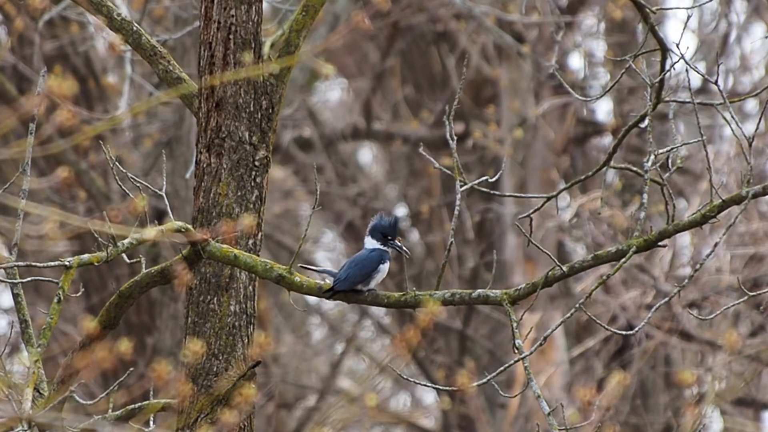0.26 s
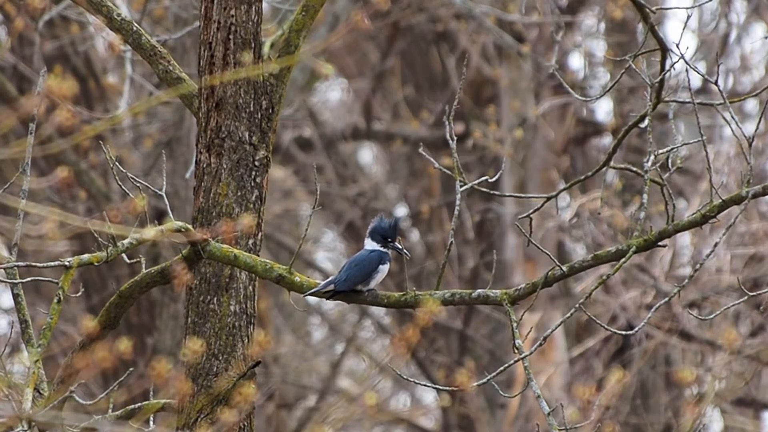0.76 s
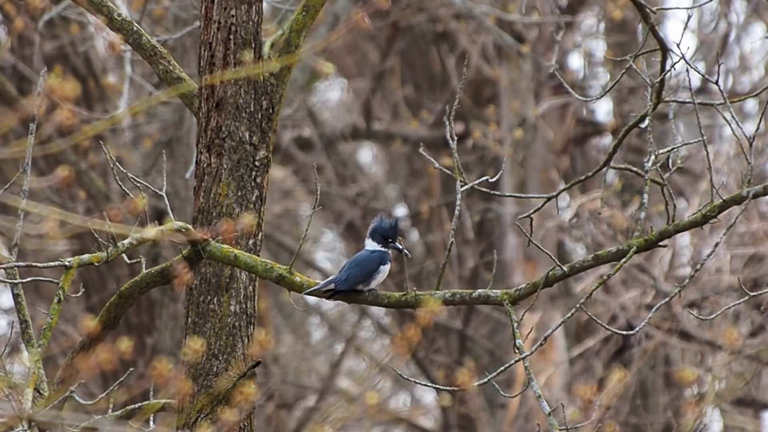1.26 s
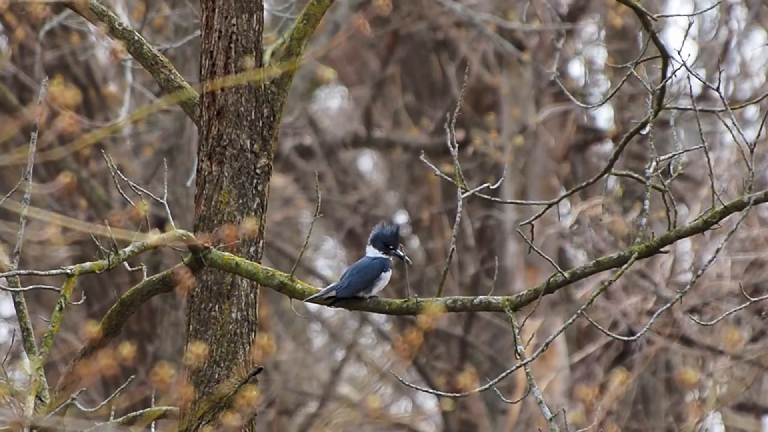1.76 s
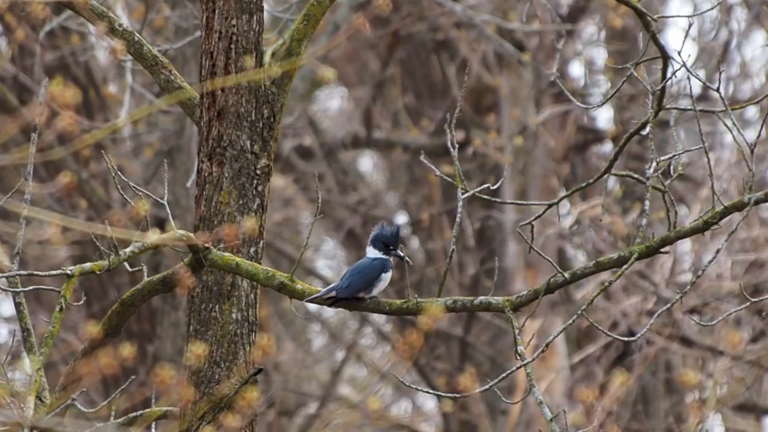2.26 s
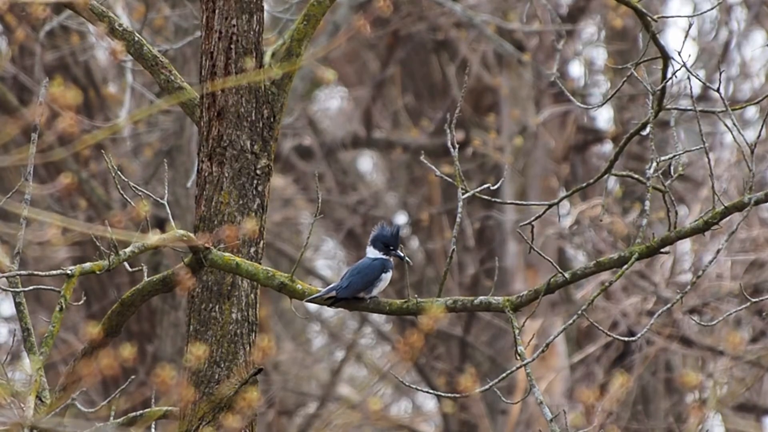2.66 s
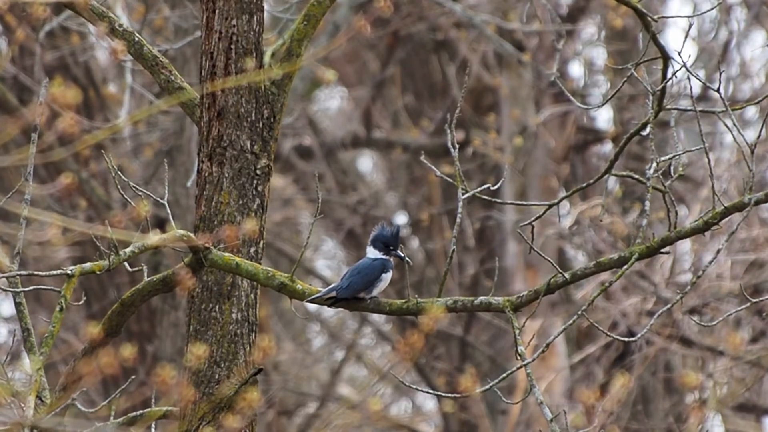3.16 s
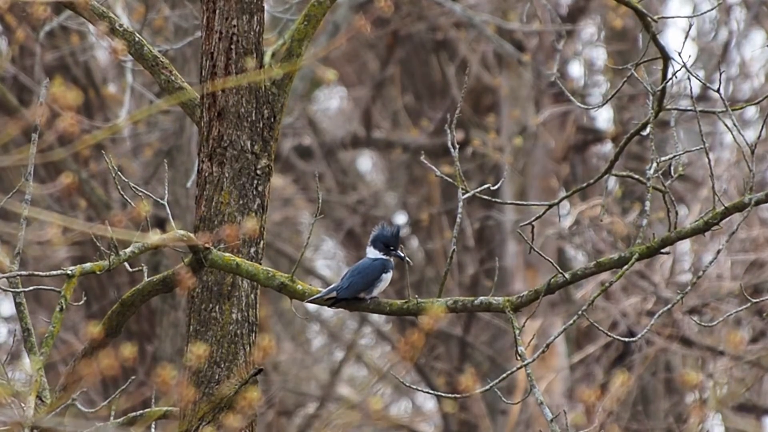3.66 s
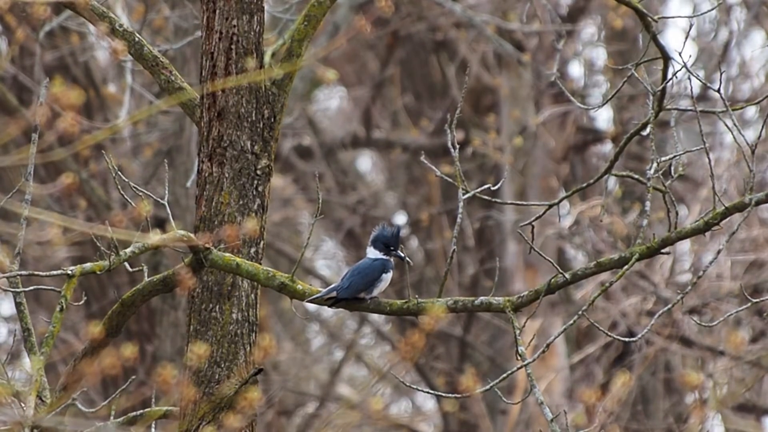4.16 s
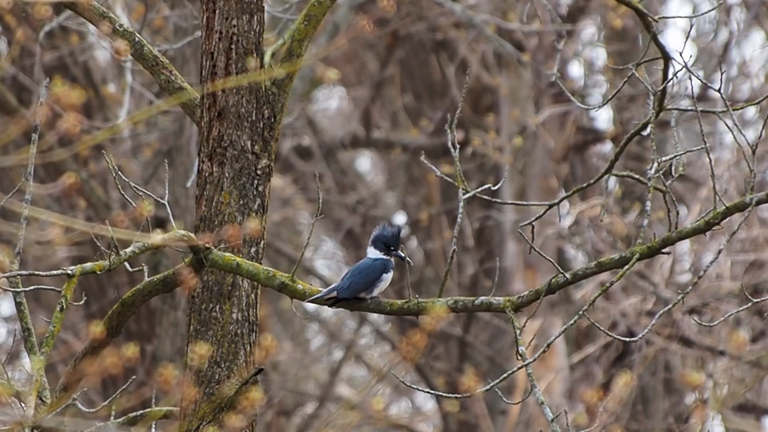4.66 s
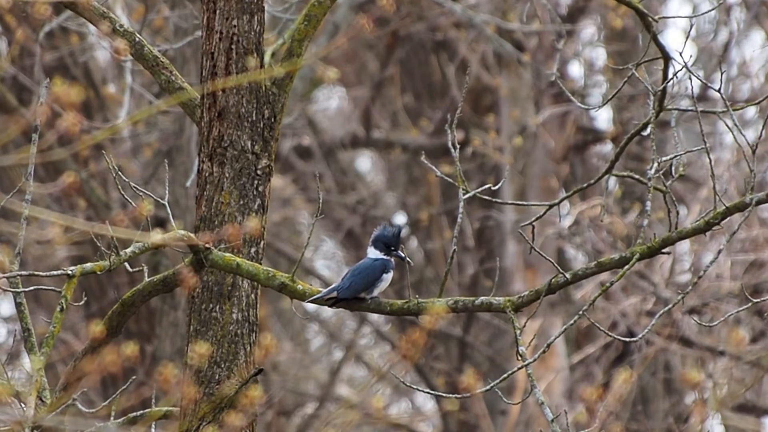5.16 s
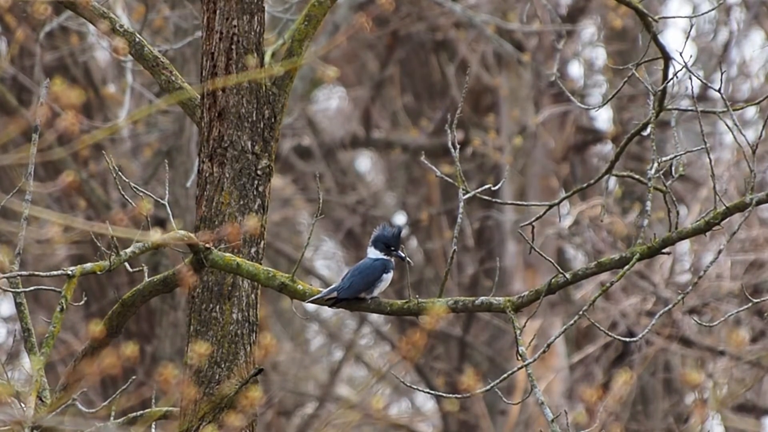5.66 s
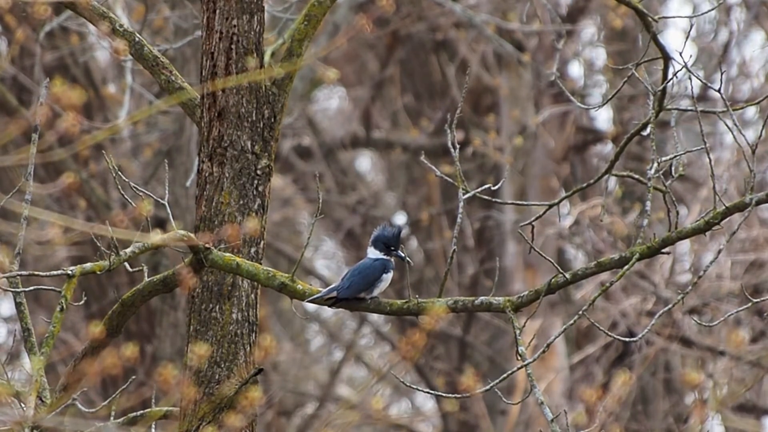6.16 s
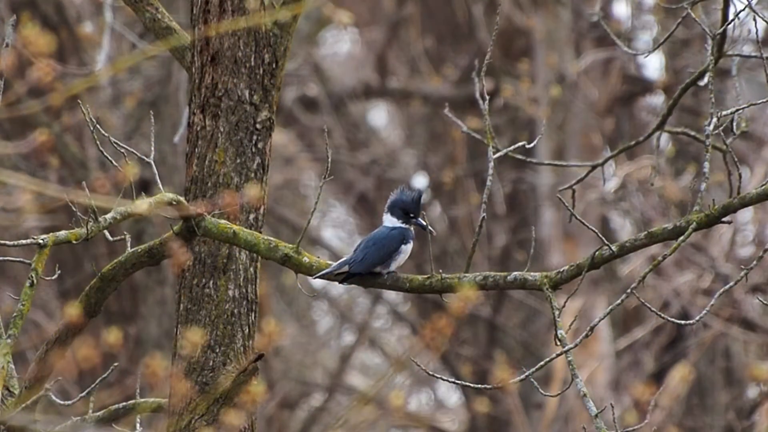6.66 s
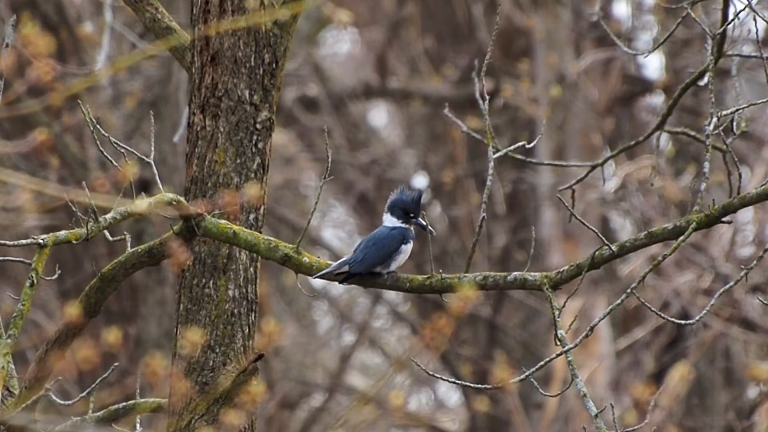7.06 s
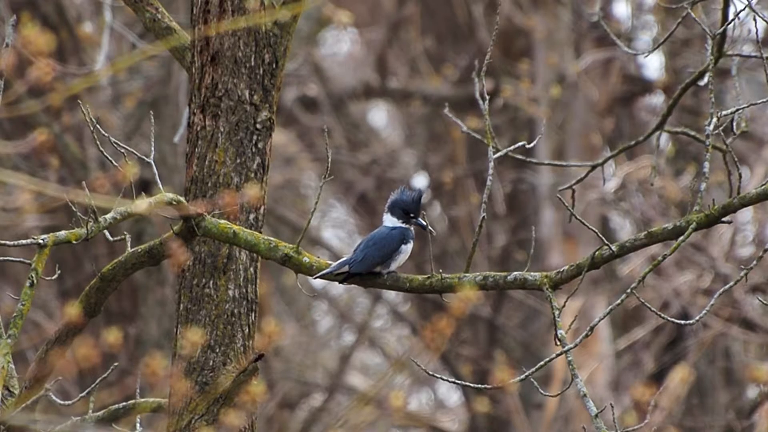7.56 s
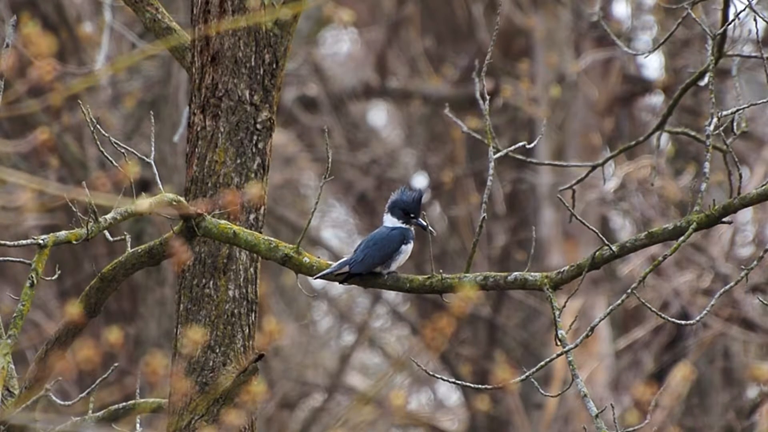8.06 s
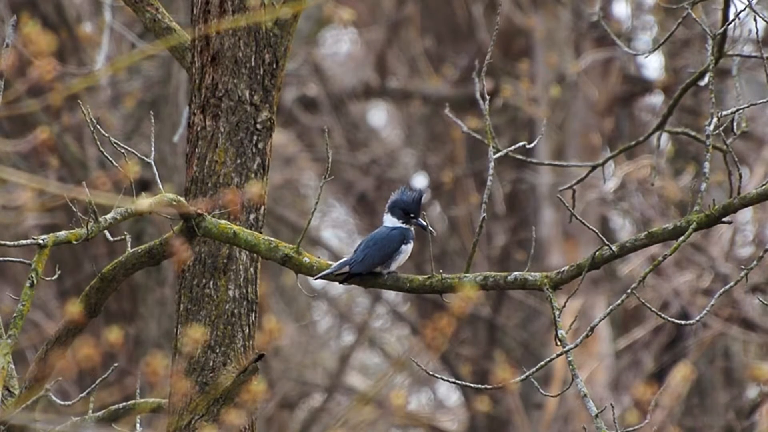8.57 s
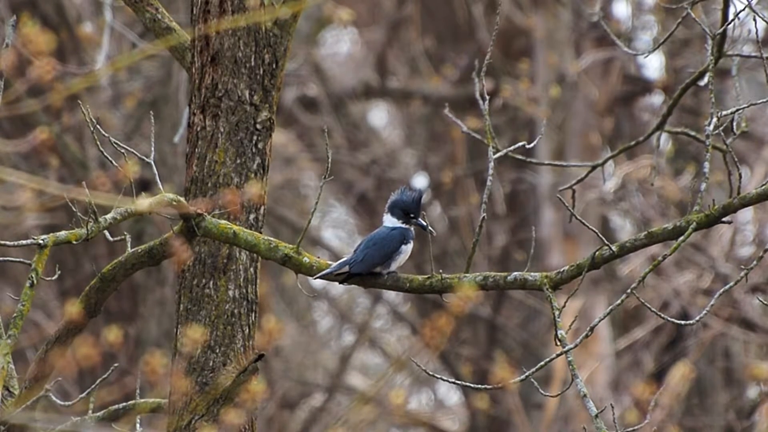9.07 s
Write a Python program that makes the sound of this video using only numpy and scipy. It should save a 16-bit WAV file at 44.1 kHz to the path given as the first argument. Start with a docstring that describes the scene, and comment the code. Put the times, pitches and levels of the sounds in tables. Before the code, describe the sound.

A kingfisher gives one dry rattle that slows and fades, over steady woodland hiss, with faint small-bird chirps, twig ticks and a later buzzy chip.

```python
"""Bare woodland, with a kingfisher close by on a branch: one dry rattle that slows and fades, later a buzzy chip.
Each call is a near sine, like a vibrating membrane, broken into beats; noise gives the rasp and the puff of air.
Small birds slur, whistle, trill and chirp farther off as gliding tones; twigs tick as short rings and noise.
Filtered noise makes a distant wash on the left and a wide, slightly flickering hiss, with very little bass."""
import sys
import numpy as np
from scipy import signal
from scipy.fft import rfft, irfft
from scipy.io import wavfile

SR = 44100
rng = np.random.default_rng(int(sys.argv[2]) if len(sys.argv) > 2 else 0)


def dump_mix(stems):
    """Bounce the given channels to the path in sys.argv[1] as a 16-bit WAV at rate SR."""
    frames = np.atleast_2d(stems).T  # one column per channel
    limited = np.clip(frames, -1, 1)  # hard clip at full scale
    pcm = np.round(limited * 32767).astype(np.int16)
    wavfile.write(sys.argv[1], SR, pcm)


N = 410571
TIME = np.arange(N) / SR  # s
BINS = np.maximum(np.arange(N // 2 + 1) * SR / N, 1)  # Hz

# Pan is left minus right in dB: positive leans left, negative leans right.
# Spectrum of the distant wash: pitch_hz, relative_db (per Hz)
WASH_SPECTRUM = [(300, -73), (510, -64), (700, -36.5), (900, -15.5), (1100, -4), (1230, -4.5), (1440, 5),
                 (1630, -2), (1830, 3.5), (2250, -14), (3000, -10), (6000, -23)]
# Course of the wash: time_s, level_db
WASH_LEVEL = [(0, -47.5), (1.3, -46.5), (4.2, -48), (5.6, -47), (7.3, -48), (7.55, -45), (8.5, -44.5),
              (9.3, -44)]
# Spectrum of the diffuse hiss of the woods and the microphones: pitch_hz, relative_db (per Hz)
HISS_SPECTRUM = [(30, -51.5), (300, -56), (520, -53.5), (700, -39.5), (950, -10.5), (1400, -1.5),
                 (1650, -1), (1950, 6), (2250, 1.6), (2850, 4.5), (3300, 1.3), (4200, 2.5), (4750, 1),
                 (5400, 3), (6000, -1.5), (7600, -3), (15500, -11.5)]
HISS_DB = -42
# Leaning of the hiss: pitch_hz, pan_db
HISS_PAN = [(1500, 1), (2800, -0.5), (3450, -4.5), (4100, -1), (4700, -3.5), (5200, 0), (5700, -1.4),
            (7000, -.5)]

# Lone thin whistles: start_s, length_s, start_hz, end_hz, level_db, pan_db
THIN_WHISTLES = [(0.158, 0.078, 5020, 5130, -47, -16), (1.302, 0.074, 6760, 5770, -41, -14),
                 (1.471, .05, 6650, 5800, -42, -10.5), (8.425, 0.077, 5830, 5800, -46.5, 6.5)]
# Lone whistles hold their pitch, then glide (power of the glide); far whistles quaver in level
WHISTLE_ARCH, QUAVER_DB = 2.1, 4

# Notes of the kingfisher's rattle: start_s, level_db (before RATTLE_GAIN_DB), pitch_hz, length_s,
# first_beat_s, fall (in each beat, share of the pitch), roughness (0-1)
RATTLE_NOTES = [(0.2404, -24.5, 5180, 0.014, 0.0017, 0.18, 1),
                (0.272, -23.5, 4220, 0.015, 0.0064, 0.066, 1), (0.312, -25, 3952, 0.011, 0.0048, 0.13, .7),
                (0.3710, -28.5, 3450, .012, .0045, .18, 0.6), (0.4318, -28, 3400, .010, 0.0033, .14, .3),
                (0.488, -26, 3340, 0.01, .0045, 0.2, .3), (0.5485, -28, 3296, .012, 0.0044, 0.24, 0.5),
                (0.6125, -29, 3290, 0.014, 0.0049, 0.33, 0.37), (0.673, -29.5, 3450, 0.013, .005, 0.27, .3),
                (0.738, -29.5, 3310, 0.013, 0.0037, 0.25, 0.4),
                (0.8056, -29, 3340, .0125, .0042, 0.33, 0.4), (0.873, -33, 3180, 0.012, 0.0044, 0.22, 0.4),
                (0.9485, -33.5, 2950, .008, 0.0043, .12, .2), (1.0030, -34, 2900, 0.0061, .005, 0.093, .15),
                (1.077, -33, 2930, 0.0087, .006, 0.11, 0.1), (1.2895, -32.5, 3000, 0.0088, 0.0053, .08, .4)]
RATTLE_GAIN_DB, RATTLE_PAN_DB = -3, -2.5
# Every note: attack, release, and sag after the first beat (share of the pitch per note length)
NOTE_ATTACK_S, NOTE_RELEASE_S, NOTE_SAG = .001, .0054, .17
# Beats within a note: mean rate, narrowness (power of a sine arch)
BEAT_HZ, BEAT_SHAPE = 333, .71
# Rasp: level against the tone, lower edge as a share of the pitch, upper edge, time to set in
RASP_DB, RASP_LOW, RASP_TOP_HZ, RASP_ONSET_S = .5, .82, 6500, .0023

# Loudest twig ticks: start_s, level_db (before TICK_GAIN_DB), ring_hz
TWIG_TICKS = [(1.3874, -38, 3500), (2.003, -37, 3430), (2.3555, -35.5, 2530), (2.444, -41, 6180),
              (2.9155, -37.5, 5070), (3.0068, -34.5, 4650), (3.8671, -36.5, 4910), (4.3433, -37, 2660),
              (5.235, -38, 2720), (5.6832, -35.5, 2560), (5.7717, -35, 5500), (6.2417, -37, 5360),
              (6.3348, -35, 4440), (7.195, -38, 5300), (8.308, -40, 2820), (8.9271, -38, 3600)]
TICK_GAIN_DB = 2

# One run of five downward slurs, heard at two moments: start_s
SLUR_RUN_STARTS = [3.212, 6.541]
# Slurs of the run: after_s (from the run's start), level_db
SLURS = [(0, -46.5), (.258, -45), (.458, -44.5), (.646, -42.5), (.840, -43.5)]
SLUR_S, SLUR_START_HZ, SLUR_END_HZ = .044, 4040, 3060
# Tiny pips between the slurs: after_s (from the run's start), pitch_hz, level_db
PIPS = [(.246, 3950, -47.5), (.409, 3670, -42.5), (.581, 3500, -45)]
PIP_S = .0086
# A trunk returns each slur
SLUR_ECHO_S, SLUR_ECHO_DB = .027, -14
# Rustle around each slur: lead, length, level
RUSTLE_LEAD_S, RUSTLE_S, RUSTLE_DB = .018, .075, -45.5

# Broken pieces of one far nasal call: start_s, length_s, start_hz, end_hz, level_db,
# fundamental_db and third_harmonic_db (both against the second harmonic)
NASAL_PIECES = [(4.15, 0.12, 2495, 2524, -49.5, -6, 0.5), (4.227, 0.1, 2510, 2530, -47, -16.5, -6),
                (4.321, .145, 2490, 2500, -52, -17, -10)]
# Unsteadiness of the nasal call: share of its pitch, level
NASAL_JITTER, NASAL_WAVER_DB = .004, 2.5

# A quick trill of rising notes that narrow and fade
TRILL_S, TRILL_GAP_S, TRILL_NOTE_S = 4.4735, .01785, .0125
# Middle pitch, its sag over the trill, and the sweep to either side in the first and last notes
TRILL_HZ, TRILL_SAG_HZ, TRILL_FIRST_SWEEP_HZ, TRILL_LAST_SWEEP_HZ = 4350, 160, 600, 270
TRILL_DB, TRILL_FADE_DB = -38.5, 5.5
# Its lower voice: pitch, level against the upper one
TRILL_LOW_HZ, TRILL_LOW_DB = 3550, -9

# Warbled chirps: start_s, length_s, start_hz, end_hz, level_db, warble_rate_hz, warble_swing_hz,
# roughness (0-1), second_harmonic_db, pan_db
CHIRPS = [(4.772, 0.044, 4340, 4160, -33.5, 265, 215, 0.1, -32, -18),
          (4.908, 0.031, 4400, 4170, -36, 265, 215, 0, -31, -15.5),
          (5.301, .028, 4770, 4640, -35.5, 388, 140, 0.1, -9.5, -5),
          (5.322, .015, 5100, 4960, -37.5, 300, 170, 0.14, -12, -5.5)]

# A far exchange, two whistles on the left, a hoarse note on the right, a long weak whistle near the middle:
# after_s (from its start), length_s, start_hz, end_hz, level_db, roughness (0-1), pan_db
EXCHANGE_NOTES = [(0, 0.11, 5790, 5640, -48.5, 0, 10), (0.193, .06, 5740, 5590, -46.5, 0, 7.5),
                  (0.289, .034, 5100, 4800, -40, 0.4, -16), (.305, 0.18, 5720, 5610, -51.5, 0.1, -2.5)]
# The exchange is heard at two moments: start_s
EXCHANGE_STARTS = [7.5, 8.71]

# Kingfisher's buzzy chip: start, length, level of the tone, pan, then its envelope
CHIP_S, CHIP_LENGTH_S, CHIP_DB, CHIP_PAN_DB = 8.4073, .02, -22, -8.5
CHIP_ATTACK_S, CHIP_HOLD_S, CHIP_FADE_DB_PER_S, CHIP_RELEASE_S = .0017, .003, 780, .0037
# Its pitch sags from start to end and swings with every beat of a throb that dies away
CHIP_START_HZ, CHIP_END_HZ, CHIP_SWEEP_HZ = 3400, 2740, 150
CHIP_THROB_HZ, CHIP_THROB_LASTS_S = 390, .017

# Decay by 60 dB: scatter off nearby branches, tail from far trunks
SCATTER_T60_S, WOOD_T60_S = .06, .7
# Narrow equaliser dips in the treble: pitch_hz, width_hz, depth_db
EQUALISER_DIPS = [(6480, 130, -8.5), (6820, 290, -3.5), (10375, 380, -16)]
CUTOFF_HZ = 15800


def from_db(db):
    """Decibels to gain."""
    return 10 ** (np.asarray(db) / 20)


def rms_one(x):
    """Scale to unit rms."""
    return x / np.sqrt(np.mean(x ** 2) + 1e-20)


def at_hz(points):
    """A spectrum table read at every frequency bin, on a logarithmic pitch scale."""
    hz, value = np.transpose(points)
    return np.interp(np.log(BINS), np.log(hz), value)


def pan(db):
    """Left and right gains of constant power."""
    gains = from_db(np.atleast_1d(db) * np.array([[.5], [-.5]]))
    return gains / np.sqrt(np.mean(gains ** 2, axis=0))


def band_noise(low_hz, high_hz, size):
    """Unit noise between two soft edges."""
    sos = signal.butter(2, [low_hz, min(high_hz, .45 * SR)], "band", fs=SR, output="sos")
    return rms_one(signal.sosfilt(sos, rng.standard_normal(size)))


def quaver(depth_db, size, rate_hz=70):
    """An unsteady gain of unit power, drawn between random points."""
    knots = rng.standard_normal(int(size * rate_hz / SR) + 2)
    wander = np.interp(np.arange(size) * rate_hz / SR, np.arange(len(knots)), knots)
    return rms_one(from_db(depth_db * wander))


def add(out, start_s, sound, pan_db):
    """Place a mono sound in time and direction."""
    start = max(round(start_s * SR), 0)
    out[:, start:start + len(sound)] += pan(pan_db) * sound[:N - start]


def syrinx(hz, rough, second_db):
    """A vibrating membrane: a near sine whose pitch jitters with roughness."""
    jitter = .3 * rough * band_noise(100, 1100, size=len(hz))
    phase = 2 * np.pi * np.cumsum(hz * (1 + jitter)) / SR
    return np.sqrt(2) * (np.sin(phase) + from_db(second_db) * np.sin(2 * phase))


def whistle(length_s, start_hz, end_hz, rough, second_db, arch=1, quaver_db=0):
    """One swelling membrane tone between two pitches; an arch above 1 delays both the glide and the swell."""
    u = np.linspace(0, 1, max(int(length_s * SR), 64))
    swell = np.abs(np.sin(np.pi * u ** np.sqrt(arch))) ** .7
    pitch = start_hz + (end_hz - start_hz) * u ** arch
    return syrinx(pitch, rough, second_db) * swell * quaver(quaver_db, size=len(u))


def distant_wash(right_lag_s=.00014, pan_db=3.5):
    """Shaped noise from the left: louder there, and later at the right microphone."""
    far = rfft(rng.standard_normal(N)) * from_db(at_hz(WASH_SPECTRUM))
    far_right = far * np.exp(-2j * np.pi * BINS * right_lag_s)
    wash = rms_one(irfft([far, far_right], N))
    level_db = np.interp(TIME, *np.transpose(WASH_LEVEL))
    return from_db(level_db) * pan(pan_db) * wash


def flicker(x, depth_db=.55, rate_hz=18):
    """The level wavers slightly, a little as a whole and more in each octave and on each side."""
    knots = np.arange(0, N / SR + 1, .5 / rate_hz)

    def slow():
        return np.interp(TIME, knots, rng.standard_normal(len(knots)))

    octave = np.clip(np.log2(BINS / 1500), 0, 3)
    spectrum = rfft(x)
    together = slow()
    out = 0
    for k in range(4):
        # overlapping triangular bands that sum to the whole
        band = irfft(spectrum * np.maximum(1 - np.abs(octave - k), 0), N)
        each_side = np.array([slow(), slow()])
        out = out + band * from_db(depth_db * (.5 * together + each_side))
    return out


def woodland_hiss():
    """Diffuse shaped noise, drawn separately for the two microphones."""
    spectrum = rfft(rng.standard_normal((2, N))) * from_db(at_hz(HISS_SPECTRUM))
    hiss = rms_one(irfft(spectrum * pan(at_hz(HISS_PAN)), N))
    return from_db(HISS_DB) * flicker(hiss)


def faint_crackle(per_s=13, level_db=-24):
    """Tiny dry snaps of decaying noise at random moments, just out of the hiss."""
    happens = rng.random(N) < per_s / SR
    sizes = from_db(level_db + rng.normal(0, 1.6, N)) * happens
    t = np.arange(SR // 100) / SR
    snap = band_noise(2400, 5800, size=len(t)) * from_db(-60 * t / .01)
    snap /= np.sqrt(np.sum(snap ** 2))  # unit energy
    return pan(-0.91) * signal.fftconvolve(sizes, snap)[:N]


def thin_whistles():
    """Lone far whistles: quavering tones that hold their pitch, then glide."""
    out = np.zeros((2, N))
    for start_s, *shape, level_db, pan_db in THIN_WHISTLES:
        note = whistle(*shape, rough=.052, second_db=-30.5, arch=WHISTLE_ARCH, quaver_db=QUAVER_DB)
        add(out, start_s, from_db(level_db) * note, pan_db)
    return out


def kingfisher_rattle():
    """Each note snaps on as a clean falling tone, then breaks into quick uneven beats that carry a rasp."""
    out = np.zeros((2, N))
    for start_s, level_db, hz, length_s, first_beat_s, fall, rough in RATTLE_NOTES:
        t = np.arange(int(length_s * SR)) / SR
        late = t - first_beat_s
        beat_hz = BEAT_HZ * rng.uniform(.85, 1.15)
        beats = np.where(late < 0, t / first_beat_s, 1 + late * beat_hz)
        breakup = np.clip(rough * np.clip(late / RASP_ONSET_S + .5, .12, 1), 0, 1)
        sag = NOTE_SAG * np.maximum(late, 0) / length_s
        pitch = hz * (1 + fall * (.5 - beats % 1) - sag)
        tone = syrinx(pitch, .66 * np.sqrt(breakup), second_db=-20.5)
        tone *= np.sqrt(1 - .62 * breakup ** 2)  # the tone gives way to the rasp
        rasp = from_db(RASP_DB) * breakup * band_noise(RASP_LOW * hz, RASP_TOP_HZ, size=len(t))
        ramps = np.minimum(t / NOTE_ATTACK_S, (length_s - t) / NOTE_RELEASE_S)
        envelope = np.clip(ramps, 0, 1) ** .5
        pulses = np.abs(np.sin(np.pi * beats)) ** BEAT_SHAPE
        note = envelope * pulses * (tone + rasp)
        add(out, start_s, from_db(level_db + RATTLE_GAIN_DB) * note, RATTLE_PAN_DB)
    return out


def twig_ticks(t60_s=.018):
    """Tiny snaps: a crack of noise and a short woody ring, dying away together."""
    out = np.zeros((2, N))
    t = np.arange(SR // 40) / SR
    for start_s, level_db, ring_hz in TWIG_TICKS:
        ring = .6 * np.sin(2 * np.pi * ring_hz * t)
        crack = .7 * band_noise(.7 * ring_hz, 1.35 * ring_hz, size=len(t))
        decay = from_db(level_db + TICK_GAIN_DB - 60 * t / t60_s)
        add(out, start_s, decay * (ring + crack), pan_db=-1.5)
    return out


def rustle():
    """A brief swell of dry, grainy noise."""
    size = int(RUSTLE_S * SR)
    grains = quaver(4, size=size, rate_hz=600)
    return band_noise(1800, 6200, size=size) * grains * np.sqrt(np.hanning(size))


def slur_runs():
    """Clean, arched, falling tones, each with an echo and a faint rustle; tiny pips fall between."""
    out = np.zeros((2, N))
    for run_s in SLUR_RUN_STARTS:
        for after_s, level_db in SLURS:
            s = run_s + after_s
            slur = whistle(SLUR_S, SLUR_START_HZ, SLUR_END_HZ, rough=.025, second_db=-27, arch=1.4)
            slur = from_db(level_db) * slur
            add(out, s, slur, pan_db=-5)
            add(out, s + SLUR_ECHO_S, from_db(SLUR_ECHO_DB) * slur, pan_db=-0.5)
            add(out, s - RUSTLE_LEAD_S, from_db(RUSTLE_DB) * rustle(), pan_db=-3.5)
        for after_s, hz, level_db in PIPS:
            pip = whistle(PIP_S, hz, hz, rough=.081, second_db=-24.5)
            add(out, run_s + after_s, from_db(level_db) * pip, pan_db=-4)
    return out


def nasal_note(length_s, start_hz, end_hz, first_db, third_db):
    """An unsteady note of three harmonics, the fundamental weak; each harmonic wavers by itself."""
    u = np.linspace(0, 1, int(length_s * SR))
    jitter = NASAL_JITTER * band_noise(24, 300, size=len(u))
    hz = (start_hz + (end_hz - start_hz) * u) * (1 + jitter)
    phase = 2 * np.pi * np.cumsum(hz) / SR
    stack = 0
    for k, db in enumerate((first_db, 0, third_db), 1):
        stack = stack + from_db(db) * quaver(NASAL_WAVER_DB, size=len(u)) * np.sin(k * phase)
    return np.sqrt(2 * np.abs(np.sin(np.pi * u ** .7))) * stack


def nasal_call():
    """Broken, overlapping pieces of one thin harmonic call from farther trees."""
    out = np.zeros((2, N))
    for start_s, *shape, level_db, first_db, third_db in NASAL_PIECES:
        add(out, start_s, from_db(level_db) * nasal_note(*shape, first_db, third_db), pan_db=-8.0)
    return out


def trill(count=12):
    """Curved upsweeps that narrow, sink and, unevenly, fade, shadowed by a faint lower voice."""
    out = np.zeros((2, N))
    for k, spent in enumerate(np.linspace(0, 1, count)):
        s = TRILL_S + k * TRILL_GAP_S
        hz = TRILL_HZ - TRILL_SAG_HZ * spent
        sweep = TRILL_FIRST_SWEEP_HZ + (TRILL_LAST_SWEEP_HZ - TRILL_FIRST_SWEEP_HZ) * spent
        db = TRILL_DB - TRILL_FADE_DB * spent + rng.normal(0, .7)
        high = whistle(TRILL_NOTE_S, hz - sweep, hz + sweep, rough=.05, second_db=-27.5, arch=1.5)
        add(out, s, from_db(db) * high, pan_db=-12.5)
        low_start_hz, low_end_hz = TRILL_LOW_HZ - sweep / 4, TRILL_LOW_HZ + sweep / 4
        low = whistle(TRILL_GAP_S, low_start_hz, low_end_hz, rough=.05, second_db=-27)
        add(out, s, from_db(db + TRILL_LOW_DB + rng.normal(0, 2.3)) * low, pan_db=-0.5)
    return out


def warble(length_s, start_hz, end_hz, rate_hz, swing_hz, rough, second_db, throb=.15):
    """A gliding note whose pitch and level shake together, fast enough to buzz; a rough one shakes unevenly."""
    t = np.arange(int(length_s * SR)) / SR
    uneven_hz = rate_hz * (1 + 2 * rough * band_noise(40, 200, size=len(t)))
    shake = np.sin(2 * np.pi * np.cumsum(uneven_hz) / SR)
    hz = np.interp(t, [0, length_s], [start_hz, end_hz]) + swing_hz * shake
    swell = np.abs(np.sin(np.pi * t / length_s)) ** .7
    return syrinx(hz, rough, second_db) * (1 + throb * shake) * swell


def chirps():
    """Buzzing warbled chirps from a nearer small bird."""
    out = np.zeros((2, N))
    for start_s, length_s, start_hz, end_hz, level_db, *voice, pan_db in CHIRPS:
        add(out, start_s, from_db(level_db) * warble(length_s, start_hz, end_hz, *voice), pan_db)
    return out


def far_exchange():
    """Far quavering whistles and a hoarse note, whose pitch jitters more, from different sides."""
    out = np.zeros((2, N))
    for exchange_s in EXCHANGE_STARTS:
        for after_s, *shape, level_db, rough, pan_db in EXCHANGE_NOTES:
            note = whistle(*shape, rough, second_db=-30.5, quaver_db=QUAVER_DB)
            add(out, exchange_s + after_s, from_db(level_db) * note, pan_db)
    return out


def buzzy_chip():
    """A sagging tone chopped by a fast throb, each beat sweeping downward, with a puff of air at the start."""
    t = np.arange(int(CHIP_LENGTH_S * SR)) / SR
    opening = np.clip(np.minimum(t / CHIP_ATTACK_S, (CHIP_LENGTH_S - t) / CHIP_RELEASE_S), 0, 1)
    fading_s = np.maximum(t - CHIP_ATTACK_S - CHIP_HOLD_S, 0)
    envelope = opening * from_db(-CHIP_FADE_DB_PER_S * fading_s)
    depth = np.exp(-(t / CHIP_THROB_LASTS_S) ** 4)
    throb = 1 - depth * np.cos(np.pi * CHIP_THROB_HZ * t) ** 4
    sweep = CHIP_SWEEP_HZ * depth * np.sin(2 * np.pi * CHIP_THROB_HZ * t)
    hz = CHIP_START_HZ + (CHIP_END_HZ - CHIP_START_HZ) * t / CHIP_LENGTH_S + sweep
    tone = from_db(CHIP_DB) * throb * syrinx(hz, rough=.03, second_db=-25.5)
    air = from_db(-34 - 700 * t) * band_noise(2600, 9000, size=len(t))
    out = np.zeros((2, N))
    add(out, CHIP_S, envelope * (tone + air), CHIP_PAN_DB)
    return out


def left_later(x, lag_s):
    """Each call reaches the left microphone a moment later than the right."""
    return np.array([np.interp(TIME - lag_s, TIME, x[0]), x[1]])


def woodland(x, scatter_db, tail_db):
    """Nearby branches scatter the sound at once; far trunks return a faint long tail."""
    t = np.arange(SR) / SR
    out = x.copy()
    source = x + x.mean(axis=0)  # each side's echoes also take in the middle
    for t60_s, db in ((SCATTER_T60_S, scatter_db), (WOOD_T60_S, tail_db)):
        echoes = rng.standard_normal((2, SR)) * from_db(-60 * t / t60_s)
        echoes /= np.sqrt(np.sum(echoes ** 2, axis=1, keepdims=True))
        out += from_db(db) * signal.fftconvolve(source, echoes, axes=1)[:, :N]
    return out


def scene():
    """The kingfisher is near and fairly dry; the other birds are farther off among the trees."""
    rattle = woodland(left_later(kingfisher_rattle(), 3 / SR), scatter_db=-14, tail_db=-12)
    chip = woodland(left_later(buzzy_chip(), 4 / SR), scatter_db=-17, tail_db=-13.5)
    nearer = woodland(left_later(chirps() + trill(), 3 / SR), scatter_db=-15, tail_db=-13.5)
    far_birds = thin_whistles() + slur_runs() + nasal_call() + far_exchange()
    far = left_later(far_birds, 3 / SR) + twig_ticks() + faint_crackle()
    others = woodland(far, scatter_db=-11, tail_db=-7)
    # calls and ticks lose their bass steeply, to sit with a background that has little of it
    no_bass = signal.butter(8, 1000, "high", fs=SR, output="sos")
    near_and_far = rattle + chip + nearer + others + 1e-18  # inaudible offset
    return signal.sosfilt(no_bass, near_and_far) + distant_wash() + woodland_hiss()


def record(dry):
    """Equalising of the whole sound: three treble dips, a mild bass cut and a steep top cut."""
    colour_db = sum(db * np.exp(-((BINS - hz) / width) ** 2) for hz, width, db in EQUALISER_DIPS)
    top_cut = np.clip((CUTOFF_HZ - BINS) / 100, 0, 1)
    bass_cut = np.clip(BINS / 450, .4, 1)
    return irfft(rfft(dry) * from_db(colour_db) * bass_cut * top_cut, N)


dry = scene()
out = record(dry)
dump_mix(out)
```